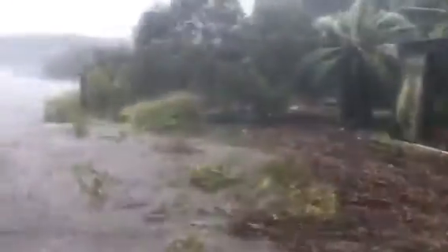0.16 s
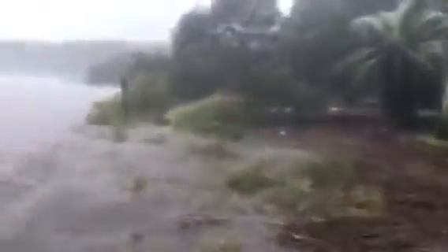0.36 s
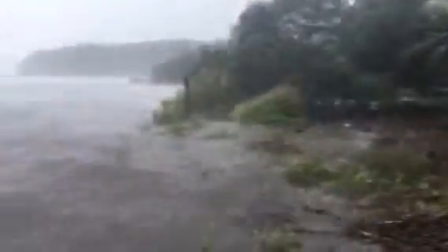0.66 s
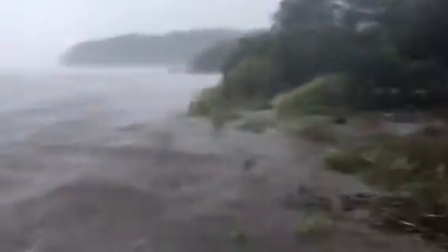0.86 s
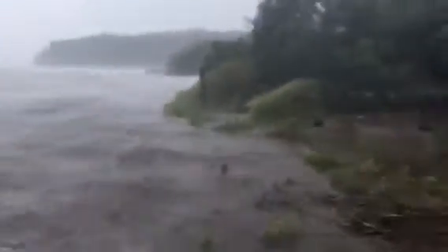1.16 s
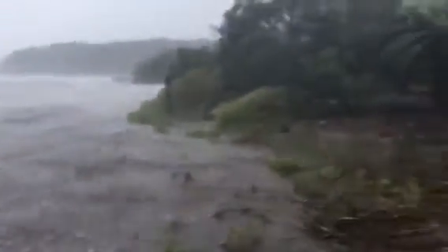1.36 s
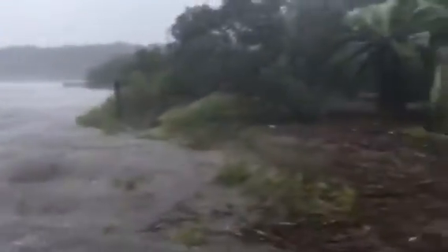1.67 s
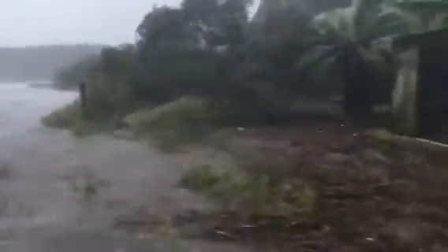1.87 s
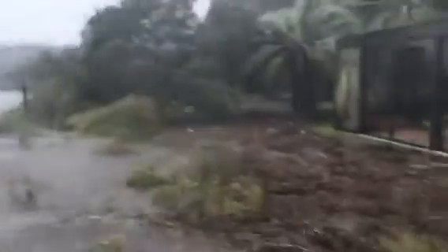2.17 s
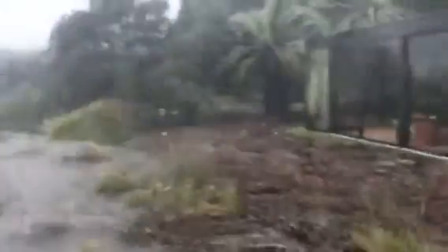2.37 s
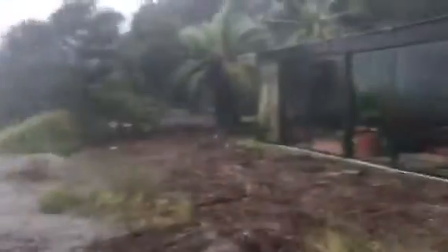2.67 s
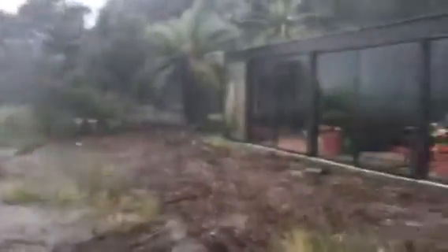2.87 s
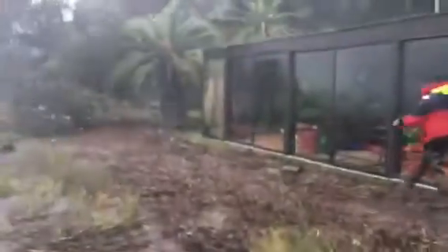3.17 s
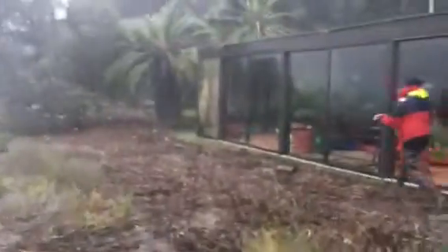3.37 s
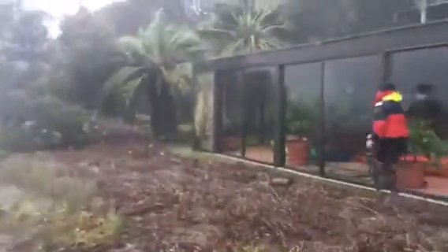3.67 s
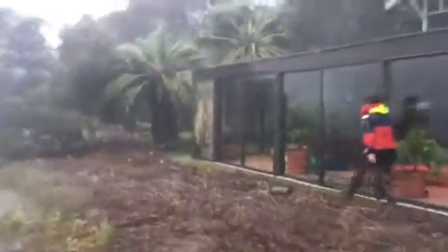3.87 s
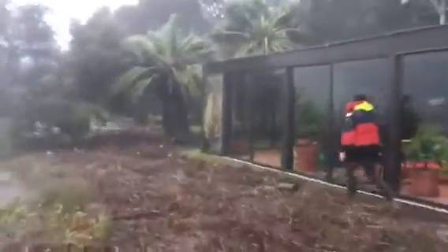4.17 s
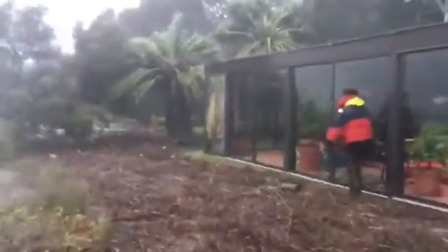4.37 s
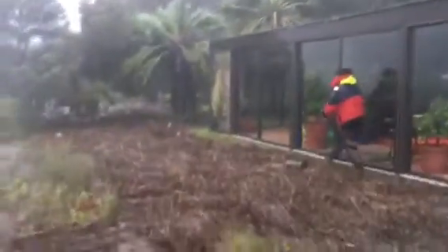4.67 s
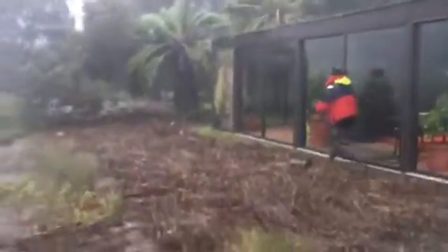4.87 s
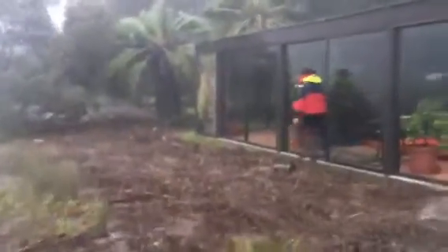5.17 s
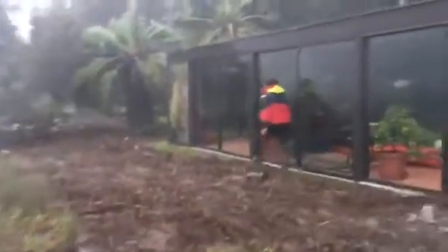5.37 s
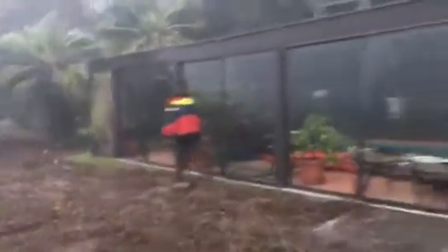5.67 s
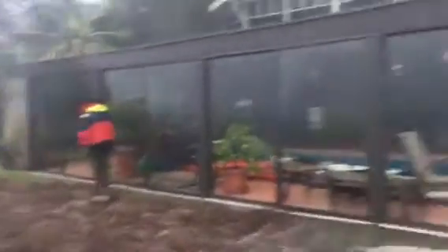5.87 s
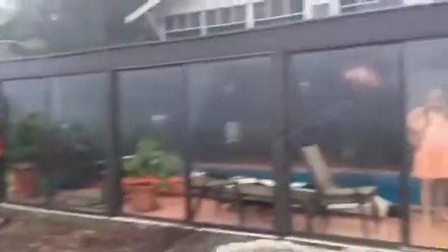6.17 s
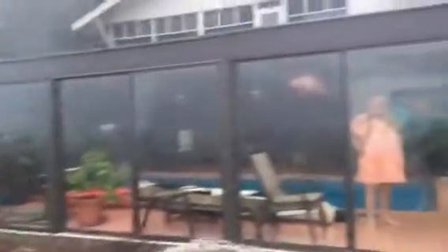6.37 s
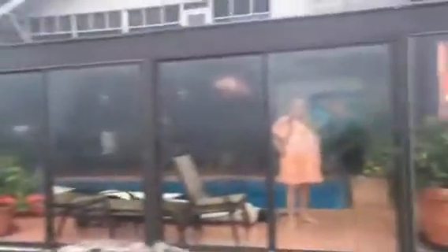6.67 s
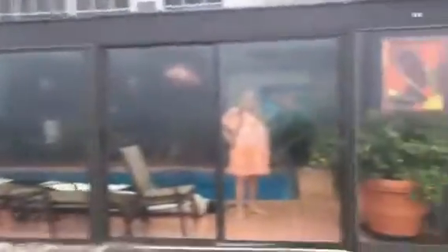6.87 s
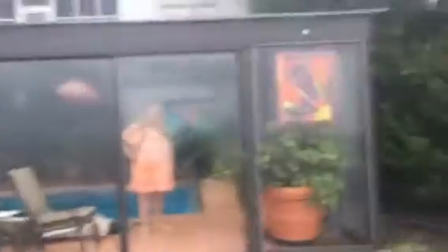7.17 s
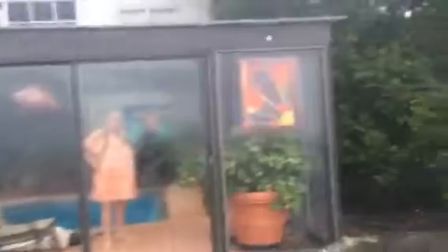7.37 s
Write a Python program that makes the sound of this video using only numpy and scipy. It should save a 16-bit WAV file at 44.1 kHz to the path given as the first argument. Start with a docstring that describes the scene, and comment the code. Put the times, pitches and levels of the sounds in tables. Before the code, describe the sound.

Close, rough wind noise on an exposed hand-held microphone: deep lumpy rumble, fluttering flaps and breathy whoosh. Hard raindrops strike the casing as dry clicks and short hollow taps, sparse early, then crowded and irregular. Distant rain on water and trees makes a thin smooth hiss behind. A few heavy thumps punctuate the gusts, loudest peaks are squashed, and the storm ends in a strong flapping gust.

```python
"""In the open, in a storm, at a small hand-held microphone. Far rain on water and trees is heard as a smooth
hiss of coloured noise, and fine spray as random ticks. Wind over the port is noise in three bands with a
wandering level: a lumpy rumble, flutter and whoosh. Drops on the casing are short noise bursts that tick and
tap. Short pitched noise swells sound beside some hits; thumps are slow damped swings, and a faint whistle is a
narrow band of noise."""
import sys
import numpy as np
from scipy import signal
from scipy.fft import rfft, irfft
from scipy.io import wavfile
from scipy.ndimage import uniform_filter1d

SR = 44100
rng = np.random.default_rng(int(sys.argv[2]) if len(sys.argv) > 2 else 0)


def pcm_store(signal):
    """Save signal as 16-bit PCM."""
    levels = np.round(np.clip(np.atleast_2d(signal), -1, 1) * 32767)
    wavfile.write(sys.argv[1], SR, levels.astype(np.int16).T)


N = 331850  # length [samples]

# Clearest drops on the casing: (time [s], tick peak level [dB],
# brightness above 7 kHz, ahead of a common lift [dB], tap peak level [dB], tap pitch [Hz])
DROPS = [(0.1924, -9, -6, -8, 1340), (0.194, -9, 0, -4, 1410), (0.4106, -10, -3, -3, 980),
         (0.4144, -8, -6, -9.5, 840), (0.823, -18, -21, -13.5, 2100), (0.9591, -10.5, 7.5, -11, 1280),
         (1.112, -25, -14, -32, 1960), (1.131, -6.5, 3, -8.5, 1780), (1.178, -18, 0, -15.5, 970),
         (1.4775, -12.5, -5, -13.5, 970), (1.602, -10.5, -14, -14.5, 810), (1.605, -14.5, 3, -25, 780),
         (1.6622, -21, 6, -23, 1110), (1.7082, -18, -4, -17.5, 860), (1.715, -19.5, -7, -38, 810),
         (1.8117, -13.5, -0.5, -21, 1680), (1.8594, -22, -3, -22, 1010), (2.4973, -23, -8, -25, 835),
         (2.515, -22, 2, -17, 920), (2.5464, -18, 7, -28, 820), (2.5502, -19, 5, -15.5, 1070),
         (2.5836, -17, 0, -21, 1090), (2.6109, -15, 5, -12, 1030), (2.619, -16, -6, -23, 900),
         (2.63, -9, -5, -19, 1130), (2.642, -17, 0, -18, 950), (2.6698, -8.5, -5, -7, 925),
         (2.705, -17, -6, -7, 1100), (2.826, -20, 5, -23, 750), (2.8608, -20, 6, -16, 1310),
         (2.883, -14, -1, -19.5, 1120), (2.889, -11, -12, -2, 1340), (2.943, -21, 1, -24, 1270),
         (2.979, -17, -6, -16.5, 930), (2.989, -25, -9, -40, 750), (3.004, -18.5, -16, -21, 820),
         (3.1174, -4.5, -10, -11, 940), (3.1334, -5.5, -1, -2, 960), (3.19, -1, -6, -5, 940),
         (3.1977, -17, -6, -7, 1570), (3.2025, -5, -3.5, -6.5, 970), (3.274, -15, -5, -26, 800),
         (3.3341, -11, 5, -28, 830), (3.386, -11, -1, -7.5, 1550), (3.4043, -4.5, 10, -5, 1070),
         (3.4366, -25, 4, -20, 1020), (3.4556, -1.5, -7, -2.5, 1280), (3.464, -18, -5, -18, 950),
         (3.5545, -15.5, -10, -17.5, 1170), (3.5728, -16.5, -18, -11, 830), (3.612, -2.5, -6, -44, 2930),
         (3.6346, -9.5, -1, -14, 1050), (3.656, -14.5, 5.5, -30, 1080), (3.7002, -19, 6, -40, 1210),
         (3.7365, -20, 8, -25, 860), (3.751, -20, 0, -34, 1360), (3.775, -20, -2, -22, 880),
         (3.7863, -22, -3, -16, 1030), (3.8347, -28, 4, -27, 1320), (3.9613, -14.5, 1, -19, 930),
         (3.9686, -16, 2, -11.5, 1110), (3.9845, -12.5, -2, -10.5, 800), (3.9929, -2.5, -3, -5, 750),
         (4.019, -22, 3, -24, 1150), (4.1233, -9, -13, -3, 910), (4.1443, -13.5, 13, -23, 820),
         (4.177, -16, -2, -16.5, 1000), (4.2045, -20, 2, -28, 1240), (4.2216, -18, 5, -36, 980),
         (4.2713, -19, -13, -43, 1460), (4.303, -27, -1, -45, 1560), (4.325, -26, -2, -16.5, 1110),
         (4.334, -14.5, -5, -13, 890), (4.3615, -6.5, -33, -13, 990), (4.4754, -15.5, -7, -16.5, 1010),
         (4.507, -29, 0, -36, 930), (4.5937, -34, 5, -31, 940), (4.68, -19, -4, -27, 1100),
         (4.6995, -27, 9, -28, 1530), (4.7633, -6, 2.5, -26, 2080), (4.792, -8, -7, -8, 990),
         (4.83, -23, -6, -23, 1570), (4.9239, -10.5, -2, -25, 2150), (5.007, -8, -14, -5.5, 1200),
         (5.037, -26, -12, -22, 900), (5.0569, -13, -4, -17, 1220), (5.064, -15, -2, -25, 930),
         (5.078, -12, 1, -19, 1460), (5.099, -20, -7, -24, 990), (5.105, -21, -2, -23, 1280),
         (5.1216, -4.5, -1, -11, 980), (5.1475, -7, -1, -13.5, 950), (5.1634, -18, -16, -25, 1710),
         (5.2316, -19, -7, -19.5, 1310), (5.3212, -24, -9, -17.5, 2040), (5.3986, -22, 5, -39, 1160),
         (5.4403, -23, 3, -27, 2530), (5.459, -12.5, 1, -15, 885), (5.488, -4, -15, -5.5, 973),
         (5.4917, -7.5, -12, -7.5, 980), (5.5921, -18, 1, -39, 1260), (5.6579, -6.5, -12, -16.5, 1300),
         (5.676, -15, 2, -23, 1040), (5.683, -13, 1, -20, 1010), (5.713, -14.5, 2, -13.5, 1370),
         (5.719, -21, 1, -26, 790), (5.7656, -9, -8, -13.5, 1020), (5.7888, -11.5, 1, -15, 1080),
         (5.826, -16, 6, -15, 3140), (5.8608, -25, -7, -32, 1220), (5.8897, -27, 2, -25, 2840),
         (5.901, -10, -9, -13.5, 960), (5.9274, -23, 1, -35, 950), (5.9662, -16, -2, -22.5, 2160),
         (5.9748, -25, 1, -24, 950), (6.0231, -13, -2, -21, 1020), (6.0693, -4.5, -16, -3, 1330),
         (6.1632, -24, 9, -22, 1270), (6.174, -15, 5, -21, 890), (6.2046, -23, 3, -23, 1390),
         (6.227, -18, 7, -23, 1090), (6.248, -24, -3, -25, 1210), (6.2808, -16.5, 5, -19.5, 1020),
         (6.3055, -20.5, -4, -20, 1060), (6.3663, -24, -2, -22, 1120), (6.3862, -9.5, 1, -14.5, 1560),
         (6.4181, -19, 2, -28, 880), (6.4297, -16, -10, -17, 1030), (6.4489, -18.5, -3, -18, 1410),
         (6.46, -16, -1, -22.5, 1080), (6.5296, -7, 1, -13.5, 1340), (6.549, -17, 4, -26, 1920),
         (6.568, -16, -3, -26, 980), (6.5793, -23, 3, -30, 1170), (6.629, -16, -11, -23, 790),
         (6.6341, -4.5, -0.5, -11.5, 1480), (6.644, -20, -9, -15, 935), (6.66, -9, -12, -14, 920),
         (6.6636, -4, 0, -13, 1300), (6.683, -23, 4, -21, 1020), (6.6945, -14, 7, -38, 1300),
         (6.6981, -16, 7, -21, 1340), (6.703, -12, -6, -14, 1450), (6.709, -16, -3, -20, 850),
         (6.7203, -7, -3, -8.5, 950), (6.749, -19, 3, -19, 970), (6.7837, -22, -8, -30, 1060),
         (6.831, -19, 5, -16, 880), (6.8448, -20, -1, -20, 1120), (6.8502, -12, 1, -12.5, 1270),
         (6.972, -14, -5, -13, 1310), (7.0032, -10.5, -6, -12.5, 850), (7.053, -23, 5, -21, 1390),
         (7.0897, -22, 2, -32, 1040), (7.1122, -17, 7, -36, 1580), (7.1325, -13.5, 0, -8, 940),
         (7.163, -12, 0, -8, 1160), (7.167, -6, -1, -21, 1230), (7.172, -13, 10, -18, 1130),
         (7.2017, -11, -2, -27, 1110), (7.2136, -19, -2, -17, 810), (7.2954, -22, 3, -13, 1140),
         (7.3632, -26, 2, -21, 860), (7.507, -10.5, -20, -16.5, 1240)]
# Response of casing and port to the blow of a drop: (frequency [Hz], relative density [dB per Hz])
TICK_SPECTRUM = [(1290, 4.5), (2200, 6), (2520, 5), (2740, -1), (3050, 2), (3380, -2), (5220, 2.5),
                 (6020, -2), (6780, -1), (7690, -8), (9320, -6), (10500, -15.5), (11600, -14.5),
                 (15200, -30), (16400, -47)]


def from_db(db):
    """Level to amplitude: 20 dB is a factor of ten."""
    return 10 ** (np.asarray(db) / 20)


def rms_one(x):
    """Normalisation by energy: scaled to rms 1."""
    return x / np.sqrt(np.mean(x ** 2) + 1e-20)


def peak_one(x):
    """Normalisation by extreme: scaled to peak 1."""
    return x / (np.max(np.abs(x)) + 1e-12)


def in_time(rows):
    """Linear interpolation: each column of a curve at every sample."""
    s, *columns = np.transpose(rows)
    t = np.arange(N) / SR
    return [np.interp(t, s, column) for column in columns]


def drift(corner_hz):
    """Slow random modulation: noise twice through a one-pole low-pass; spread 1."""
    step = 10  # computed at every tenth sample
    settling = 4000  # discarded while the filter settles
    pole = np.exp(-2 * np.pi * corner_hz * step / SR)
    white = rng.standard_normal(N // step + settling + 2)
    slow = signal.lfilter([1], [1, -2 * pole, pole * pole], white)[settling:]
    return np.interp(np.arange(N) / step, np.arange(len(slow)), rms_one(slow))


def response(spectrum):
    """Minimum-phase (causal) impulse response of a spectrum, by folding its cepstrum."""
    hz, db = np.transpose(spectrum)
    size = 2 ** 14
    grid_hz = np.maximum(np.arange(size // 2 + 1) * SR / size, 1)
    grid_db = np.interp(np.log(grid_hz), np.log(hz), db, db[0] - 52.5, db[-1] - 0.5)
    cepstrum = irfft(np.log(from_db(grid_db)))
    cepstrum[1:size // 2] *= 2
    cepstrum[size // 2 + 1:] = 0
    return irfft(np.exp(rfft(cepstrum)))


def noise(spectrum, lumps_db):
    """Spectral shaping: white noise of wandering level, coloured by a spectrum; rms 1."""
    white = rng.standard_normal(N) * from_db(lumps_db)
    return rms_one(signal.fftconvolve(white, response(spectrum))[:N])


def ring(x, hz, cycles):
    """Damped resonance: a two-pole filter that dies by 60 dB in the given cycles."""
    r = from_db(-60 * hz / (cycles * SR))
    w = 2 * np.pi * hz / SR
    return signal.lfilter([0, np.sin(w)], [1, -2 * r * np.cos(w), r * r], x)


def add(track, s, sound):
    """Superposition: mixes a short sound in at a time."""
    i = round(s * SR)
    track[i:i + len(sound)] += sound[:N - i]


def far_rain():
    """Incoherent sum of countless far impacts on water and trees, heard as a smooth hiss."""
    # Level of the hiss as heard, sinking and recovering: (time [s], level [dB])
    hiss_level = [(0.0, -40), (0.21, -46.5), (0.63, -44.5), (0.9, -42), (1.36, -41.5), (1.55, -40),
                  (2.7, -41.5), (3.35, -47), (3.85, -44.5), (4.31, -51), (5.93, -46.5), (6.2, -60),
                  (6.68, -46), (7.52, -47)]
    # Colour of the hiss: (frequency [Hz], relative density [dB per Hz])
    hiss_spectrum = [(820, -3.5), (1400, 2.5), (1920, 2), (2450, 0.5), (2690, -2), (3100, -3), (3500, -7.5),
                     (4470, -1.5), (4900, -8), (6800, -11), (7760, -16), (9130, -14.5), (12200, -18),
                     (15200, -22), (16000, -30)]
    hiss_db = in_time(hiss_level)[0]
    return from_db(hiss_db) * noise(hiss_spectrum, 0.6 * drift(30.0))


def spray():
    """Poisson-like impacts of uneven rate: fine drops tick on the casing in clumps and around clear drops."""
    # Fine spray as the casing turns into the weather, ahead of clumping: (time [s], rate [drops per s])
    spray_rate = [(0, 25), (2.4, 58), (2.6, 140), (4.0, 41), (5.0, 190), (5.6, 120), (7.2, 160), (7.52, 36)]
    least_db, spread_db = -39, 5.5  # weakest tick, and mean excess over it before the cap
    extra_per_drop, around_s = 2.5, 0.016  # mean extra ticks, within this time either side of a clear drop
    marks = np.zeros(N)
    marks[(np.array(DROPS)[:, 0] * SR).astype(int)] = extra_per_drop * SR
    clumped = in_time(spray_rate)[0] * from_db(4.8 * drift(5.4))
    rate = clumped + uniform_filter1d(marks, int(2 * around_s * SR))
    excess_db = spread_db * np.minimum(rng.exponential(1, N), 3.0)
    sizes = from_db(excess_db) * rng.choice([-1, 1], N)
    impacts = sizes * (rng.random(N) < rate / SR)
    tick = peak_one(response(TICK_SPECTRUM)[:400])
    return from_db(least_db) * signal.fftconvolve(impacts, tick)[:N]


def whistle():
    """Edge tone of moving air: quadrature carriers, slowly modulated, blur a mostly falling tone to a band."""
    # Faint whistle of air over an edge: (time [s], pitch [Hz], level [dB])
    edge_tone = [(5.7, 1385, -120), (5.77, 1380, -51), (5.81, 1320, -39), (5.87, 1214, -42),
                 (5.94, 1053, -43), (6.0, 1100, -53), (6.1, 1050, -120)]
    hz, db = in_time(edge_tone)
    phase = 2 * np.pi * np.cumsum(hz) / SR
    return from_db(db) * (drift(80) * np.sin(phase) + drift(80) * np.cos(phase))


def wind():
    """Turbulence at the port: large eddies rumble and buffet, smaller ones flutter and whoosh in shared lumps."""
    # Wind between the single eddies: (time [s], rumble level [dB], flutter level [dB], whoosh level [dB])
    wind_levels = [(0.0, -31, -26.5, -29.5), (0.4, -38, -40.5, -39), (0.84, -34.5, -38, -34),
                   (1.3, -40, -41, -38.5), (1.63, -37.5, -36, -34), (2.07, -33.5, -38, -37),
                   (2.49, -31.5, -36.5, -33.5), (2.64, -23.5, -30, -33), (2.91, -32, -35, -35.5),
                   (3.2, -17, -30.5, -30), (3.75, -16, -23, -35), (4.12, -27, -40, -38.5),
                   (4.4, -41, -32.5, -43), (4.59, -22.5, -28.5, -39), (4.96, -20, -29, -40.5),
                   (5.25, -18.5, -22.5, -37), (5.59, -17.5, -27, -39), (5.86, -21, -27, -41),
                   (6.2, -26, -30, -41.5), (6.66, -21.5, -27.5, -34.5), (7.01, -19.5, -21.5, -33),
                   (7.52, -15, -14, -28)]
    # Large eddies buffeting the port, swells of the rumble: (centre time [s], level [dB], length [ms])
    buffets = [(.31, -23.5, 40), (.42, -18, 38), (.66, -27, 78), (.83, -22.5, 94), (.94, -29, 30),
               (1.14, -28, 69), (1.35, -20.5, 26), (1.46, -29, 40), (1.69, -26, 50), (2.15, -27, 44),
               (2.4, -25, 44), (2.49, -26, 17), (2.57, -21, 40), (2.91, -23, 20), (3.02, -10, 73),
               (3.11, -16.5, 30), (3.29, -13, 22), (3.52, -7.5, 29), (3.6, -8, 23), (3.73, -8, 18),
               (3.86, -15, 35), (3.99, -14, 48), (4.43, -19, 140), (4.71, -24, 36), (4.832, -7.5, 24),
               (4.97, -16.5, 54), (5.35, -15, 27), (5.61, -17, 24), (5.7, -15, 20), (5.77, -14, 74),
               (6.08, -16.5, 100), (6.29, -15, 29), (6.49, -16.5, 68), (6.81, -13.5, 40), (7.12, -8, 25),
               (7.19, -14.5, 30), (7.31, -15.5, 30), (7.47, -12, 72)]
    # Colours of the three bands: (frequency [Hz], relative density [dB per Hz])
    rumble_spectrum = [(12, -3), (20, -31), (37, -2.5), (60, 2), (86, -1.5), (170, -9.5), (220, -20),
                       (370, -120)]
    flutter_spectrum = [(76, -30), (130, -5.5), (204, 1), (308, -3.5), (386, -8), (500, -28.5), (650, -18),
                        (1100, -120)]
    whoosh_spectrum = [(250, -16.5), (420, 1), (508, -2), (657, -4), (1120, -7), (1600, -14), (2080, -35),
                       (3520, -120)]
    rumble_db, flutter_db, whoosh_db = in_time(wind_levels)
    t = np.arange(N) / SR
    power = from_db(rumble_db) ** 2
    for s, db, length_ms in buffets:
        near = slice(max(round((s - 0.2) * SR), 0), round((s + 0.2) * SR))
        swell = np.exp(-2.5 * ((t[near] - s) * 1000 / length_ms) ** 2)
        power[near] += (from_db(db) * swell) ** 2
    eddies = drift(29.0)
    rumble = np.sqrt(power) * noise(rumble_spectrum, 2.1 * eddies + 1.65 * drift(43.0))
    flutter = from_db(flutter_db) * noise(flutter_spectrum, 3.46 * eddies)
    whoosh = from_db(whoosh_db) * noise(whoosh_spectrum, 2.6 * eddies + 1.8 * drift(60.0))
    return rumble + flutter + whoosh


def flaps():
    """Resonant filtering of turbulence: noise twice through a broad resonance, in a Gaussian swell and fade."""
    # Single strong eddies flapping across the port: (centre time [s], level [dB], length [ms])
    eddy_flaps = [(0.037, -17, 31), (.197, -9, 3.1), (0.416, -8, 7.7), (.568, -26.5, 39), (.671, -15.5, 16),
                  (.804, -17, 35), (0.863, -23, 9.4), (1.025, -22, 6.2), (1.136, -17.5, 8.6),
                  (1.391, -29, 32), (1.878, -27.5, 21), (2.006, -25.5, 38), (2.309, -30, 34),
                  (2.492, -14, 24), (2.595, -21, 43), (2.663, -15.5, 24), (2.739, -7, 8.7),
                  (2.775, -17.5, 11), (2.822, -15, 14.3), (3.018, -10.5, 43), (3.125, -17.5, 25),
                  (3.258, -22.5, 86), (3.398, -14, 23), (3.839, -27, 51), (3.901, -27.5, 68),
                  (3.997, -19, 15), (4.125, -15.5, 2.8), (4.176, -22, 32), (4.726, -21, 28),
                  (4.796, -23, 15), (5.202, -17, 37), (5.266, -16, 19), (5.738, -20, 28), (6.074, -16, 9.6),
                  (6.264, -26.5, 32), (6.608, -22, 15), (6.799, -9.5, 26.5), (6.934, -18, 48),
                  (7.013, -6.5, 6.9), (7.075, -17, 51), (7.18, -20, 37), (7.256, -21.5, 39),
                  (7.317, -8, 13), (7.363, -5, 25), (7.391, -9, 7.2), (7.425, -12, 8.8), (7.462, -12, 16)]
    middle_hz, scatter_oct = 338, 0.2
    out = np.zeros(N)
    ms = np.arange(-3000, 3000) * 1000 / SR
    airs = rng.standard_normal((len(eddy_flaps), len(ms)))
    for (s, db, length_ms), air in zip(eddy_flaps, airs):
        hz = middle_hz * 2 ** (scatter_oct * air[0])
        flap = ring(np.diff(air, prepend=0), hz, 3.2)
        flap = rms_one(ring(flap, hz, 1.4))
        flap = flap * np.exp(-2.5 * (ms / length_ms) ** 2)
        skip = max(round(-ms[0] * SR / 1000 - s * SR), 0)  # part ahead of time zero
        add(out, max(s + ms[0] / 1000, 0), from_db(db) * flap[skip:])
    return out


def thumps():
    """Impulse response of a heavily damped oscillator: a soft push of air swings the membrane."""
    # Drops and eddies that slap the port shut: (time [s], peak level [dB], pitch [Hz])
    slaps = [(0.192, -15, 66), (0.415, -2.5, 76), (1.133, -0.5, 297), (2.739, -0.5, 364), (3.997, 2, 77),
             (4.458, -11, 51.6), (4.714, -4, 53.8), (4.796, -16, 68), (5.491, -3.5, 121), (6.071, -2, 104)]
    out = np.zeros(N)
    push = np.zeros(4000)
    push[:40] = np.hanning(40)
    for s, db, hz in slaps:
        add(out, s, from_db(db) * peak_one(ring(push, hz, cycles=1.8)))
    return out


def pitched_swells():
    """Resonant filtering: short pitched noise swells beside some drops, strongest near a centre pitch."""
    # Swells: (time [s], peak level of a 0 dB band at the centre pitch [dB], centre pitch [Hz])
    swells = [(1.125, -12, 2110), (2.665, -12, 2560), (2.702, -9, 1190), (3.111, -19, 2550),
              (3.129, -27, 2590), (3.195, -19, 2270), (3.399, -17, 2370), (3.452, -18, 1500),
              (3.988, -7.5, 700), (4.118, -8.5, 920)]
    # Resonances that colour the noise: (frequency [Hz], relative level [dB], 60 dB decay time [ms])
    resonances = [(690, -12, 49), (870, -6, 18), (1253, -2.5, 21), (1832, 2, 23), (2217, -2, 18.6),
                  (2484, -2.5, 31), (3080, -2.5, 35)]
    rise_ms, t60_ms = 4.0, 28.0  # of the noise ahead of the resonances
    fall_db = 28.0  # loss one octave from the centre, growing as the square of the octaves
    out = np.zeros(N)
    ms = np.arange(3000) * 1000 / SR
    shape = np.minimum(ms / rise_ms, 1) ** 2 * from_db(-60 * ms / t60_ms)
    hisses = rng.standard_normal((len(swells), len(ms)))
    for (s, db, centre_hz), hiss in zip(swells, hisses):
        for hz, band_db, band_t60_ms in resonances:
            band = ring(hiss * shape, hz, hz * band_t60_ms / 1000)
            band = ring(band, hz, hz * 0.004)  # second resonance, dies by 60 dB in 4 ms
            loss_db = fall_db * np.log2(hz / centre_hz) ** 2
            add(out, s, from_db(db + band_db - loss_db) * peak_one(band))
    return out


def drops():
    """Impact excitation: a dying splash of noise gives a tick through the casing and a briefly ringing tap."""
    splash_ms, scatter_oct = 1.61, 0.1  # length where tap and tick peaks are equal, and its random spread
    db_per_doubling = 12.5  # a splash lasts longer the more its tap outweighs its tick
    bright_lift_db = 4.0  # common lift above 7 kHz
    tap_cycles = 7.3  # cycles in which the main tap resonance dies by 60 dB
    out = np.zeros(N)
    casing = response(TICK_SPECTRUM)[:400]
    ms = np.arange(1200) * 1000 / SR
    below = signal.butter(3, 7000, "low", fs=SR, output="sos")
    above = signal.butter(3, 7000, "high", fs=SR, output="sos")
    splashes = rng.standard_normal((len(DROPS), 2, len(ms)))
    for (s, tick_db, bright_db, tap_db, tap_hz), (fine, coarse) in zip(DROPS, splashes):
        doublings = (tap_db - tick_db) / db_per_doubling + scatter_oct * fine[0]
        length_ms = np.clip(splash_ms * 2 ** doublings, 0.2, 3.5)
        burst = np.minimum(ms / 0.098, 1) * np.exp(-(ms / length_ms) ** 2)
        tick = np.convolve(fine * burst, casing)[:len(ms)]
        bright = from_db(bright_db + bright_lift_db) * signal.sosfilt(above, tick)
        tick = signal.sosfilt(below, tick) + bright
        tap = ring(ring(coarse * burst, tap_hz, tap_cycles), tap_hz, 1.4)
        add(out, s, from_db(tick_db) * peak_one(tick) + from_db(tap_db) * peak_one(tap))
    return out


def scene():
    """Linear superposition: all sources add at one microphone."""
    background = far_rain() + spray() + whistle()
    air = wind() + flaps() + thumps()
    return (background + air + pitched_swells() + drops())[None]


def record(dry):
    """Band limiting and compression: bass cut, gain control, rounding of the loudest peaks, top cut."""
    threshold_db, share = -4, 0.63  # peaks over the threshold lower the gain by this share of the excess
    recovery_db_per_s, attack_s = 20, 0.024  # the gain creeps back; its changes are smoothed
    ceiling, cutoff_hz = 0.68, 17000  # amplitude limit of the rounding; edge of the top cut
    dry = signal.sosfilt(signal.butter(2, 40, "high", fs=SR, output="sos"), dry)
    creep_db = recovery_db_per_s * np.arange(N) / SR
    level_db = 20 * np.log10(np.abs(dry) + 1e-9)
    excess_db = share * np.maximum(level_db - threshold_db, 0)
    # a running maximum on a rising ramp holds each peak and lets it fall steadily
    held_db = np.maximum.accumulate(excess_db + creep_db, axis=1) - creep_db
    r = np.exp(-1 / (attack_s * SR))
    reduction_db = signal.lfilter([1 - r], [1, -r], held_db)
    dry = dry * from_db(-reduction_db)
    rounded = dry / (1 + np.abs(dry / ceiling) ** 4) ** (1 / 4)
    return signal.sosfilt(signal.cheby2(12, 70, cutoff_hz, fs=SR, output="sos"), rounded)


dry = scene()
out = record(dry)
pcm_store(out)
```